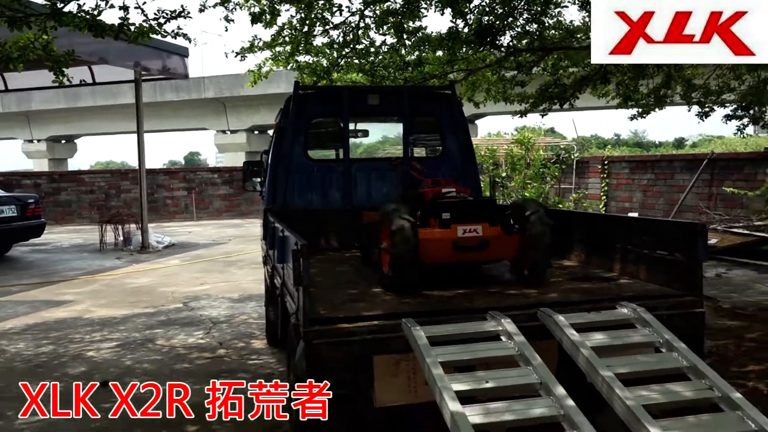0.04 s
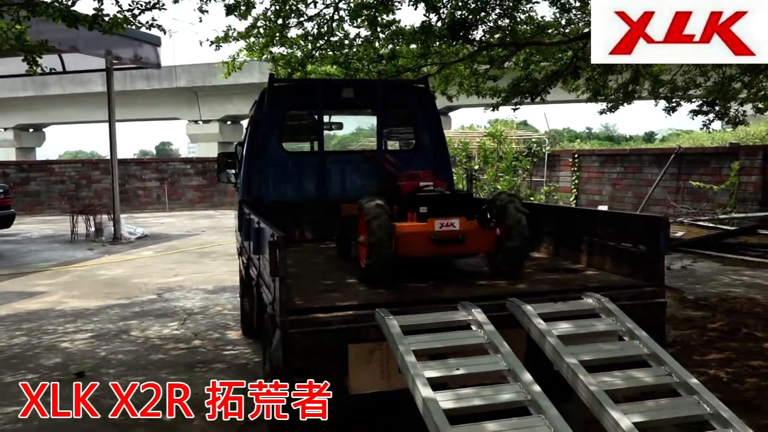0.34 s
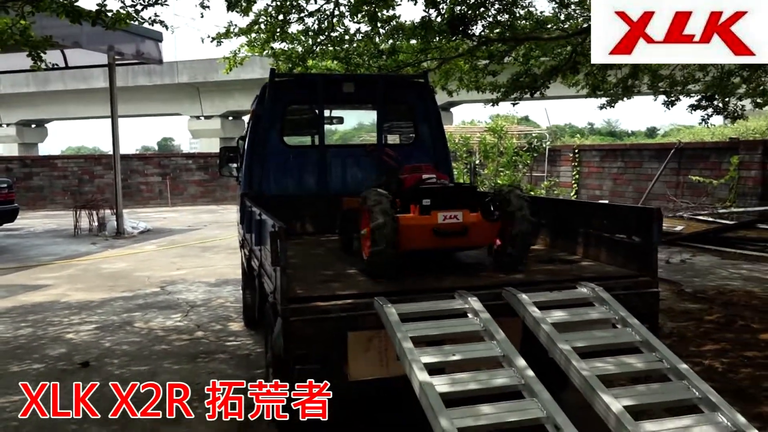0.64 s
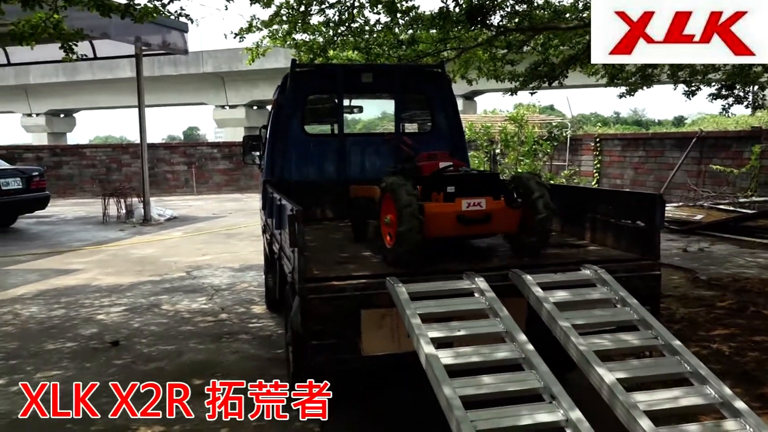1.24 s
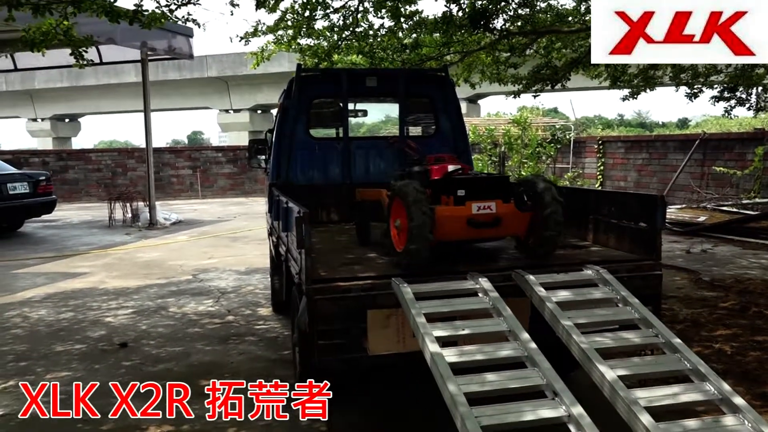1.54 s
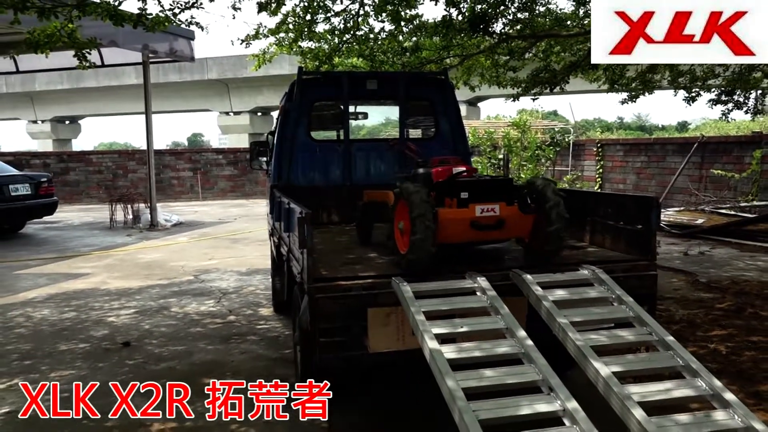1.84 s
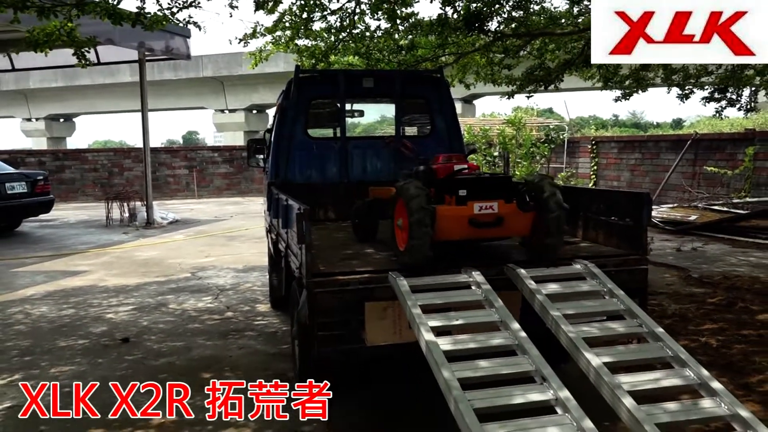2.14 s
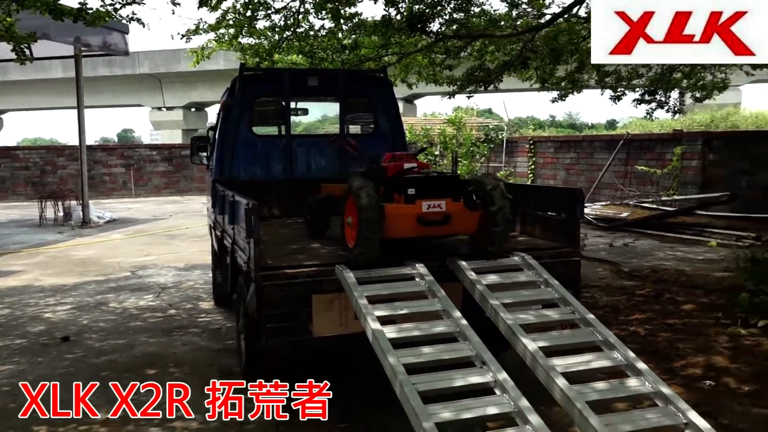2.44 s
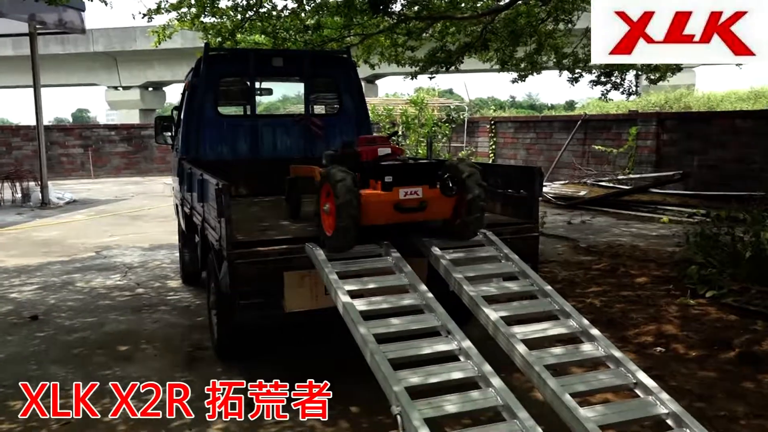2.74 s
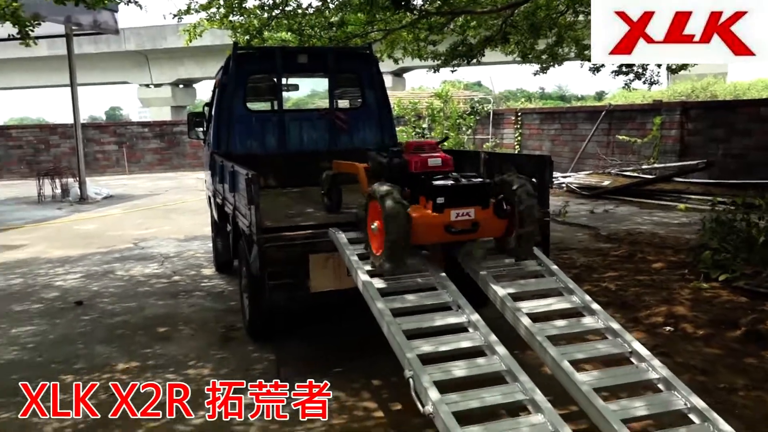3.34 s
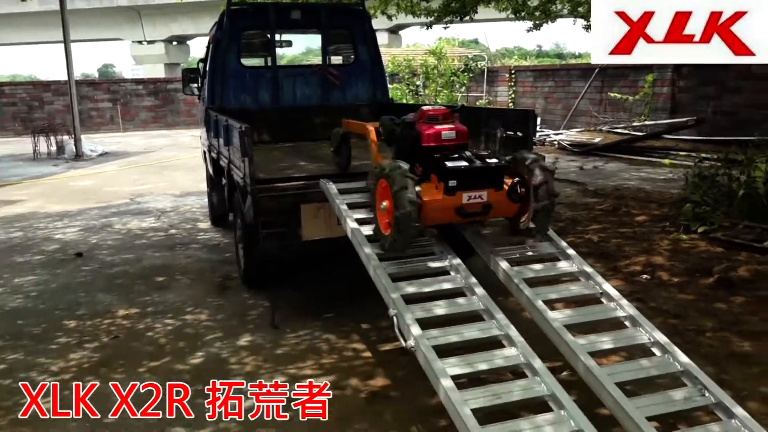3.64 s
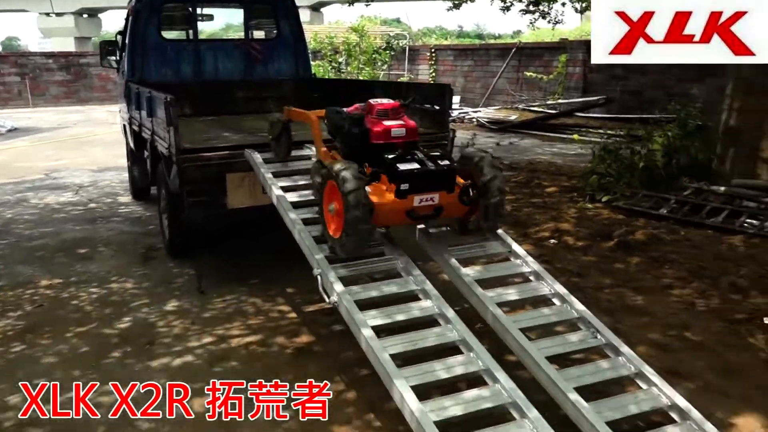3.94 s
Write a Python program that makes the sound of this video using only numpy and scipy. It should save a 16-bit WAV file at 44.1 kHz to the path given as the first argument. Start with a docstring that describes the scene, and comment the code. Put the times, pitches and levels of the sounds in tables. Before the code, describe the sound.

Metal loading ramps clank and rattle under a mower's wheels while sparrows chirp close by.

```python
"""A wheeled mower creeps off a truck bed onto two aluminium loading ramps, ahead of the microphone.
Its drive hums low; the tyres thump onto the ramps and squeak, the ramps chatter against the
tailgate and ring, and the steel bed booms. Sparrows chirp in the trees close overhead, a flock
twitters farther off. The place is a quiet walled yard with short echoes, heard nearly in mono."""
import sys
import numpy as np
from scipy import signal
from scipy.fft import rfft, irfft
from scipy.io import wavfile

SR = 44100
rng = np.random.default_rng(int(sys.argv[2]) if len(sys.argv) > 2 else 0)


def dump_mix(stems):
    """Bounce the given channels to the path in sys.argv[1] as a 16-bit WAV at rate SR."""
    frames = np.atleast_2d(stems).T  # one column per channel
    limited = np.clip(frames, -1, 1)  # hard clip at full scale
    pcm = np.round(limited * 32767).astype(np.int16)
    wavfile.write(sys.argv[1], SR, pcm)


N = 176400
TIME = np.arange(N) / SR


def from_db(db):
    """Decibels to gain."""
    return 10 ** (np.asarray(db) / 20)


def rms_one(x):
    """Scale to rms 1."""
    return x / np.sqrt(np.mean(x ** 2) + 1e-20)


def at_hz(points, hz):
    """Read a table on a log-frequency axis."""
    freqs, values = np.transpose(points)
    return np.interp(np.log(np.maximum(hz, 1)), np.log(freqs), values)


def coloured(x, spectrum):
    """Shape a signal by rows of frequency in Hz and gain in dB."""
    gain = from_db(at_hz(spectrum, np.fft.rfftfreq(len(x), 1 / SR)))
    return irfft(rfft(x) * gain, len(x))


def drift(hz, size=N):
    """Smooth random wavering of spread 1."""
    r = np.exp(-2 * np.pi * hz / SR)
    noise = rng.standard_normal(max(size, SR // 5) + SR // 10)
    return rms_one(signal.lfilter([1], [1, -2 * r, r * r], noise)[SR // 10:])[:size]


def add(track, start, sound):
    """Mix a sound in at a start in seconds."""
    i = int(np.clip(start * SR, 0, N - 1))
    track[i:i + len(sound)] += sound[:N - i]


def through(x, response):
    """Play a signal through an impulse response."""
    return signal.fftconvolve(x, response)[:N]


def phase_of(hz):
    """Running phase of a changing pitch."""
    return 2 * np.pi * np.cumsum(hz) / SR


def swell(size):
    """Rise and fall of one short note."""
    return np.sqrt(2) * np.abs(np.sin(np.linspace(0, np.pi, size))) ** 0.28


def dying_noise(spectrum, t60s):
    """Countless overlapping modes, dying band by band; energy 1."""
    hz = np.arange(SR // 2 + 1)
    noise = rfft(coloured(rng.standard_normal(SR), spectrum))
    centres = np.geomspace(100, 15000, 9)
    out = np.zeros(SR)
    for centre in centres:
        band = irfft(noise * at_hz(np.c_[centres, centres == centre], hz))
        out += band * from_db(-60 * TIME[:SR] / at_hz(t60s, centre))
    return rms_one(out) / np.sqrt(SR)


# The wash at the microphone. Each row: frequency in Hz, gain in dB.
AIR_SPECTRUM = [(15, -42), (25, -9), (107, 0), (156, -4), (1050, -7), (2200, -11.5), (5500, -14),
                (9050, -26), (13500, -27.5), (15500, -35)]
# Its slow dip and return. Each row: time in seconds, relative level in dB.
AIR_LEVEL = [(0, -47.5), (1.2, -49.5), (2.25, -51), (2.7, -48)]

def air(gain_db=8):
    """Steady outdoor wash and soft rolling noise."""
    wash = rms_one(coloured(rng.standard_normal(N), AIR_SPECTRUM))
    return wash * from_db(gain_db + np.interp(TIME, *np.transpose(AIR_LEVEL)))


# The mower's drive, ahead of the microphone. Each row: time in seconds, hum pitch in Hz.
DRIVE_PITCH = [(0, 110), (4, 106.3)]
# The hum's partials. Each row: multiple of the pitch, level in dB.
DRIVE_PARTIALS = [(1, -52.5), (1.5, -63), (2, -63)]

def drive(wobble=0.0526, flutter_db=3, whine_hz=3483, whine_db=-52.5):
    """The motor gives a wavering low hum and a thin whine."""
    pitch = np.interp(TIME, *np.transpose(DRIVE_PITCH))
    phase = phase_of(pitch * (1 + wobble * drift(13.1)))
    hum = sum(from_db(db + flutter_db * drift(9.3)) * np.sin(k * phase) for k, db in DRIVE_PARTIALS)
    whine = np.sin(phase_of(whine_hz * (1 + 0.0061 * drift(58))))
    whine *= from_db(whine_db + 3.2 * drift(6.1))
    return np.sqrt(2) * (hum + whine)


def chirp(length, pitches, hoarse, trill_hz=330.2, swing_hz=1140, tremble_db=4, octave_db=-29):
    """A sparrow's arched whistle with a weak octave; a fast uneven trill makes it hoarse."""
    n = int(length * SR)
    arch = np.polyval(np.polyfit([-1, 0, 1], pitches, 2), np.linspace(-1, 1, n))
    pace, depth, tremble = drift(149.6, n), drift(138, n), drift(107, n)
    trill = np.sin(phase_of(trill_hz * (1 + 0.35 * pace))) * (1 + 0.22 * depth)
    phase = phase_of(arch + swing_hz * hoarse * trill)
    whistle = np.sin(phase) + from_db(octave_db) * np.sin(2 * phase)
    return from_db(tremble_db * hoarse * tremble) * swell(n) * whistle


def flock(notes_per_s=51, centre_hz=5000, spread=0.33, fall=0.145, level_db=-46.5):
    """Farther sparrows twitter at random and reach the microphone only as echoes."""
    out = np.zeros(N)
    for when, height in rng.random((int(notes_per_s * N / SR), 2)):
        hz = centre_hz * (1 + spread * (2 * height - 1))
        add(out, when * N / SR, chirp(length=0.046, pitches=[hz, hz, hz * (1 - fall)], hoarse=0.617))
    return rms_one(yard(out)) * from_db(level_db)


# The walled yard around the microphone. Each row: frequency in Hz, seconds to die by 60 dB.
YARD_T60 = [(200, 0.56), (4000, 0.41), (12000, 0.18)]

def yard(x, build_up_s=0.0051):
    """Scattered echoes from walls, truck and trees."""
    tail = dying_noise([(100, 0), (15000, 0)], YARD_T60)
    onset = 1 - np.exp(-(TIME[:SR] / build_up_s) ** 2)
    return through(x, tail * onset)


# Sparrow notes from the trees overhead. Each row: start and length in seconds, first, middle
# and last pitch in Hz, relative level in dB, hoarseness (0 is a pure whistle).
SPARROW_NOTES = [(0.11, 0.046, 2480, 2186, 1970, -49, 0.14), (0.128, 0.026, 4720, 4120, 3450, -48, 0.1),
                 (0.221, 0.072, 6400, 5800, 5000, -39, 0.7), (0.271, 0.043, 5000, 4497, 3600, -26.5, 0.81),
                 (0.316, 0.024, 5200, 4600, 3940, -30, 0.92), (0.343, 0.042, 4240, 5350, 4680, -34.5, 0),
                 (0.348, 0.031, 4140, 3680, 3370, -26.5, 0.47),
                 (0.455, 0.04, 3950, 4790, 4350, -30.5, 0.26), (0.496, 0.047, 3736, 3830, 4980, -31, 0.2),
                 (.58, 0.075, 6300, 5190, 4260, -35, 1.03), (0.648, 0.06, 5200, 4610, 3760, -36.5, 1.01),
                 (0.835, 0.035, 3524, 4720, 4320, -27.5, 0.35),
                 (0.866, 0.054, 3750, 3937, 3084, -28.5, 0.53), (0.899, 0.08, 3120, 2610, 2210, -44, 0.28),
                 (0.909, .06, 6300, 6150, 5740, -42.5, .9), (0.989, 0.051, 4825, 4400, 3610, -32.5, 0.68),
                 (1.033, 0.052, 3090, 2574, 2180, -43, 0.5), (1.099, 0.047, 4500, 4630, 4400, -38.5, 0.61),
                 (1.262, 0.076, 5700, 4870, 4110, -37, 0.79), (1.367, 0.023, 5090, 5300, 5040, -29, 0.19),
                 (1.404, 0.059, 5000, 4510, 4170, -33, 0.54), (1.464, 0.039, 5050, 4330, 3030, -27, 0.67),
                 (1.63, 0.047, 4300, 3155, 3040, -34.5, 0.59), (1.779, 0.045, 5640, 5530, 5490, -33, 0.15),
                 (1.853, 0.05, 4543, 5100, 4790, -30.5, 0.8), (1.917, 0.054, 5300, 5190, 4690, -35, 1.44),
                 (2.031, 0.017, 5320, 5060, 4500, -36.5, 1.24), (2.107, 0.019, 5260, 5000, 4700, -36, 1.3),
                 (2.119, .045, 4950, 4710, 3240, -33, 0.25), (2.187, 0.024, 4470, 4040, 3280, -31.5, 1.42),
                 (2.205, 0.056, 4550, 4370, 2840, -34.5, 0.15), (2.269, 0.02, 5170, 5100, 4700, -36, 1),
                 (2.351, 0.037, 5040, 5280, 5230, -37.5, 1.19), (2.421, 0.019, 5380, 5030, 4660, -34, 0.9),
                 (2.454, 0.029, 2510, 2210, 1860, -45, 0), (2.486, 0.027, 5050, 5260, 4900, -35.5, 0.62),
                 (2.529, 0.08, 5360, 4680, 3465, -33.5, 1.1), (2.624, 0.047, 5230, 5120, 5000, -33.5, 0.62),
                 (2.696, 0.016, 5740, 5630, 4800, -29, 0.8), (2.944, 0.038, 4870, 3900, 3300, -28, 0.75),
                 (2.986, 0.041, 4115, 3657, 2890, -32, 0.6), (3.048, 0.045, 4216, 4560, 4430, -32, 1.1),
                 (3.137, 0.018, 5800, 5650, 5100, -31.5, 0.68), (3.162, 0.026, 5330, 5120, 4150, -28, 0.73),
                 (3.193, 0.039, 4114, 3840, 3100, -28.5, 0.69),
                 (3.213, 0.019, 6100, 5850, 5500, -31.5, 1.34), (3.257, 0.017, 5800, 5520, 5200, -34, 0.23),
                 (3.379, 0.013, 5490, 5370, 5000, -32.5, 1.1)]

def sparrows(gain_db=0.5, echo_db=-3):
    """Birds near the microphone, heard directly and echoed by the yard."""
    out = np.zeros(N)
    for start, length, *pitches, db, hoarse in SPARROW_NOTES:
        add(out, start, from_db(db + gain_db) * rms_one(chirp(length, pitches, hoarse)))
    return out + from_db(echo_db) * yard(out)


def contacts(rows, bounces_per_s=420, spread_db=3, first_force=1.93):
    """The force of blows: each a firm contact followed by a run of uneven bounces."""
    out = np.zeros(N)
    for start, length, db in rows:
        gaps = rng.uniform(0.3, 1.7, 64)
        delays = (np.cumsum(gaps) - gaps[0]) / bounces_per_s
        forces = from_db(spread_db * rng.standard_normal(64)) * rng.choice([-1, 1], 64)
        forces *= np.clip((length - delays) * bounces_per_s, 0, 1)  # the bouncing stops
        forces[0] = first_force
        forces *= from_db(db) * np.sqrt((length + 0.028) * SR / np.sum(forces ** 2))
        for delay, force in zip(delays, forces):
            add(out, start + delay, np.array([force]))
    return out


def struck(spectrum, t60s, crack_gain=1.56, crack_s=0.0046):
    """Response of a metal body: a short crack, then its dense ring."""
    return dying_noise(spectrum, t60s) * (1 + crack_gain * np.exp(-TIME[:SR] / crack_s))


def ringing(chatter, thumps, modes, t60_s=0.19, tyre_soft_hz=1040):
    """Distinct ramp modes share the blows' energy; soft tyres drive mainly the low ones."""
    out = np.zeros(N)
    r = from_db(-60 / (t60_s * SR))
    for hz, db in modes:
        hard = hz ** 2 / (hz ** 2 + tyre_soft_hz ** 2)
        force = hard * chatter + (1 - hard) * thumps + 1e-18
        resonator = [1, -2 * r * np.cos(2 * np.pi * hz / SR), r * r]
        out += from_db(db) * rms_one(signal.lfilter([1, 0, -1], resonator, force))
    return out * np.std(chatter + thumps)


# Ahead of the microphone, the wheels load the ramps and the ramps chatter on the tailgate.
# Each row: start in seconds, length in seconds, force level in dB.
WHEEL_THUMPS = [(2.64, 0.21, -43), (2.711, 0.0057, -16), (2.79, 0.056, -46.5), (3.483, 0.027, -32),
                (3.875, .054, -19), (3.921, 0.033, -15.5)]
TAILGATE_CHATTER = [(2.712, 0.024, -24.5), (2.736, 0.032, -16.5), (2.793, 0.042, -17),
                    (3.312, 0.028, -31.5), (3.435, 0.035, -36.5), (3.482, 0.048, -18.5),
                    (3.622, 0.001, -33), (3.644, 0.021, -18.5), (3.676, 0.029, -15), (3.72, 0.04, -18),
                    (3.804, 0.061, -16.5), (3.875, 0.061, -21.5), (3.92, 0.067, -19.5), (3.975, 0.084, -16)]
# The ramps' dense ring under each kind of blow. Each row: frequency in Hz, gain in dB.
THUMP_SPECTRUM = [(50, -45), (260, 0), (450, -13.5), (620, 4), (1150, -2.5), (3000, -10), (8000, -30)]
CHATTER_SPECTRUM = [(100, -15.5), (450, -24), (750, -3.5), (5200, -1), (7000, -9.5), (11000, -17),
                    (13300, -14.5), (15500, -48)]
# How long that ring lasts. Each row: frequency in Hz, seconds to die by 60 dB.
THUMP_T60 = [(100, 0.84), (300, 0.29), (800, 0.21), (5000, 0.54)]
CHATTER_T60 = [(100, 0.54), (600, 0.16), (3000, 0.2), (8000, 0.34), (15000, 0.15)]
# Ramp modes with the wheels on the lip, then the rungs. Each row: frequency in Hz, relative level in dB.
LIP_MODES = [(555, -11.5), (770, -23.5), (856, -16), (1110, -23), (1470, -12.5), (2024, -16.5), (2837, -7),
             (2950, -15), (3128, -15), (3650, -16.5), (4484, -17), (4743, -14), (4947, -10), (5464, -19),
             (5857, -23), (6783, -27), (7951, -23), (13110, -30)]
RUNG_MODES = [(388, -19), (555, -17), (700, -19.5), (856, -21), (1012, -16), (1210, -23), (1550, -20),
              (2020, -15), (2394, -21.5), (2950, -19.5), (3128, -28.5), (3461, -20.5), (3644, -23),
              (4213, -20), (4683, -16.5), (4953, -7), (5464, -16.5), (6751, -22), (13090, -20)]

def ramps(on_rungs_s=3.25, dense_db=-1, low_cut_hz=110):
    """Thumps and chatter set the aluminium ringing; other modes speak once the wheels reach the rungs."""
    chatter, thumps = contacts(TAILGATE_CHATTER), contacts(WHEEL_THUMPS)
    dense = through(chatter, struck(CHATTER_SPECTRUM, CHATTER_T60))
    dense += through(thumps, struck(THUMP_SPECTRUM, THUMP_T60))
    on_lip = TIME < on_rungs_s
    ring = ringing(chatter * on_lip, thumps * on_lip, LIP_MODES)
    ring += ringing(chatter * ~on_lip, thumps * ~on_lip, RUNG_MODES)
    low_cut = signal.butter(2, low_cut_hz, "high", fs=SR, output="sos")
    return signal.sosfilt(low_cut, from_db(dense_db) * dense + ring)


# Jolts to the truck bed, at the top of the ramps. Each row: start and length in seconds, level in dB.
BED_JOLTS = [(2.714, 0.025, -27), (2.77, 0.038, -38), (2.845, 0.067, -36.5), (3.9, 0.078, -32.5)]
# The bed's low resonance. Each row: frequency in Hz, gain in dB.
BED_SPECTRUM = [(70, -24), (150, -9.5), (250, 2), (330, -5.5), (450, -23), (1000, -53)]

def truck_bed(t60_s=0.41):
    """The steel bed booms as the weight shifts."""
    force = contacts(BED_JOLTS)
    boom = through(force, dying_noise(BED_SPECTRUM, [(1000, t60_s)]))
    return rms_one(boom) * np.std(force)


# Squeaks out on the ramps. Each row: start and length in seconds, pitch in Hz, level in dB.
SQUEAKS = [(3.053, 0.022, 1092, -25.5), (3.68, 0.042, 2420, -19), (3.826, .023, 4810, -13),
           (3.981, 0.018, 5020, -19)]

def squeaks(roughness=0.026):
    """Tyres and metal stick and slip in brief unsteady tones."""
    out = np.zeros(N)
    for start, length, hz, db in SQUEAKS:
        n = int(length * SR)
        pitch = hz * (1 + roughness * drift(330, n))
        add(out, start, from_db(db) * swell(n) * np.sin(phase_of(pitch)))
    return out


# Stereo width at the microphone. Each row: frequency in Hz, gain of the side signal in dB.
SIDE_SPECTRUM = [(60, -18), (330, -11.5), (1790, -22), (4190, -22), (6410, -6.5), (9810, 1), (15000, -36)]

def scene(metal_echo_db=-8.5, scatter_s=0.00093):
    """All sources centred on the microphone, nearly mono, wider in one treble band."""
    metal = ramps() + truck_bed() + squeaks()
    mid = metal + from_db(metal_echo_db) * yard(metal) + sparrows() + drive() + air() + flock()
    scatter = rng.standard_normal(SR // 20) * np.exp(-TIME[:SR // 20] / scatter_s)
    side = coloured(through(mid, scatter / np.linalg.norm(scatter)), SIDE_SPECTRUM)
    return np.array([mid + side, mid - side])


def record(dry, stopband_hz=16200):
    """Peaks are rounded, the top is cut."""
    high_cut = signal.cheby2(16, 70, stopband_hz, fs=SR, output="sos")
    return signal.sosfilt(high_cut, np.tanh(dry))


dry = scene()
out = record(dry)
dump_mix(out)
```